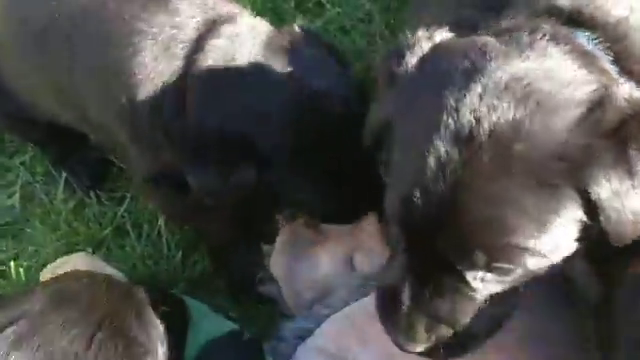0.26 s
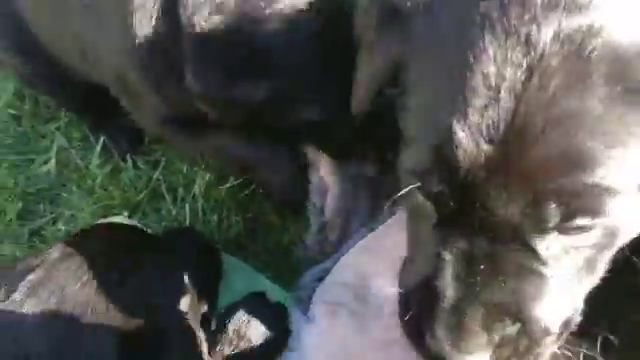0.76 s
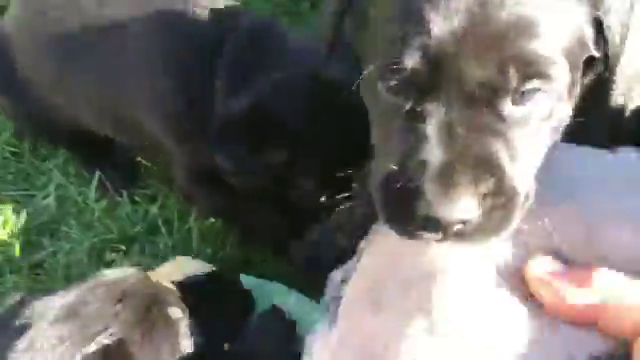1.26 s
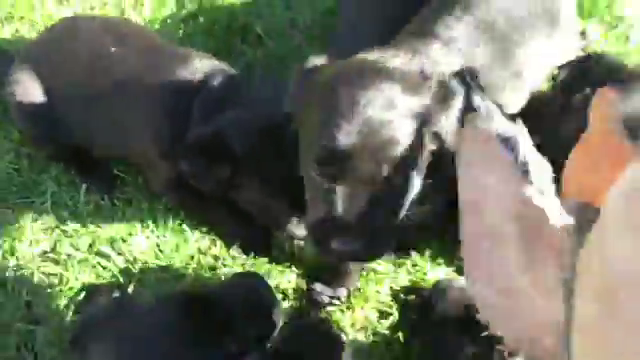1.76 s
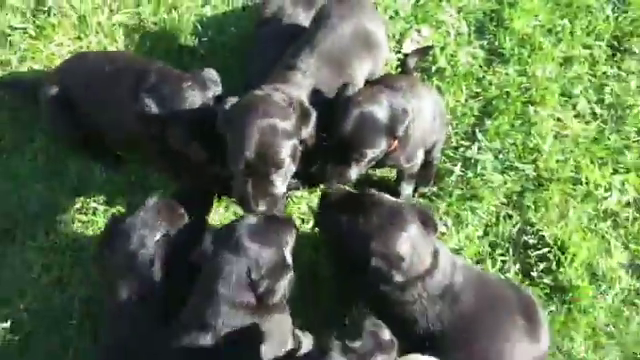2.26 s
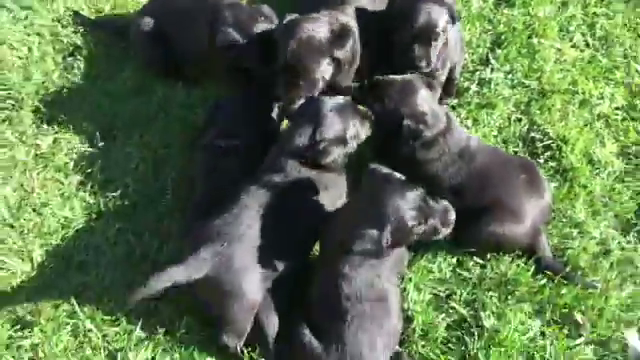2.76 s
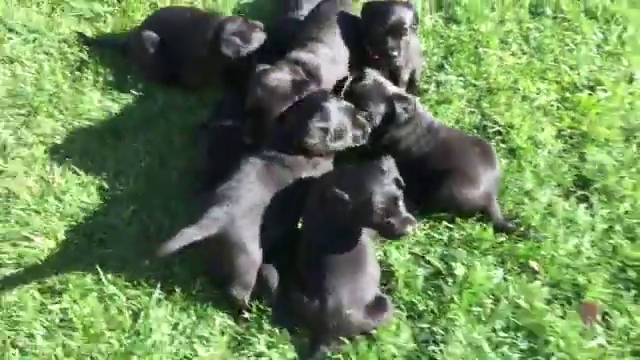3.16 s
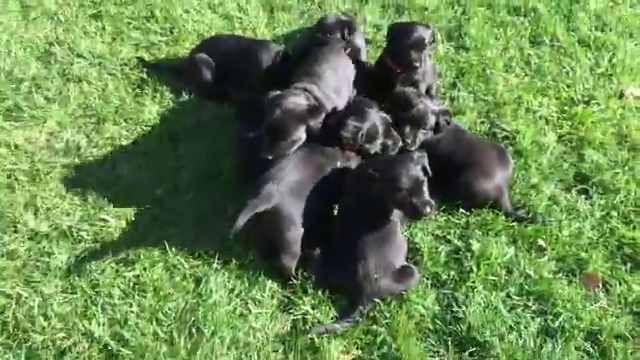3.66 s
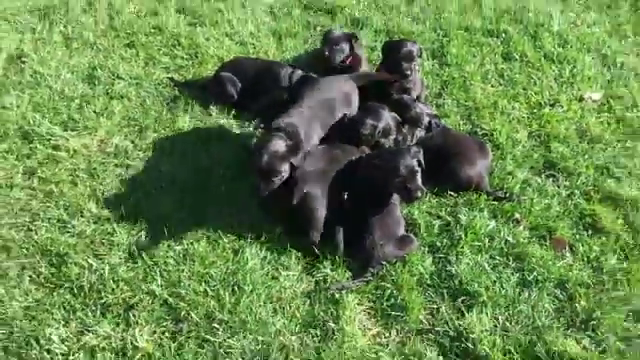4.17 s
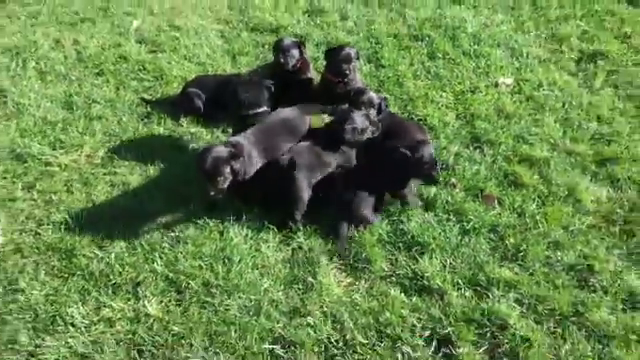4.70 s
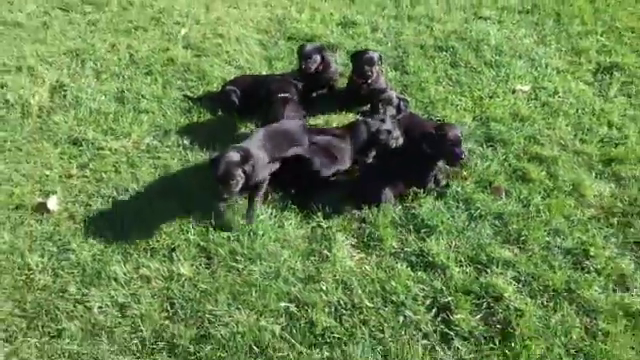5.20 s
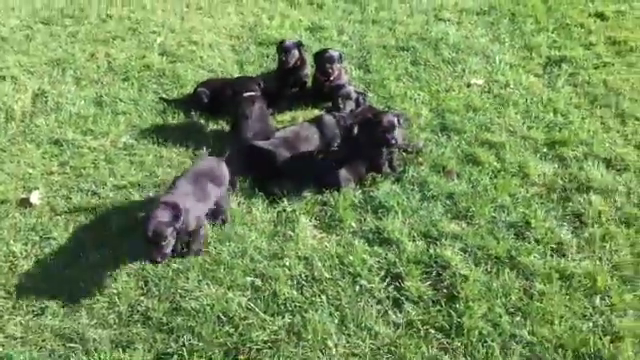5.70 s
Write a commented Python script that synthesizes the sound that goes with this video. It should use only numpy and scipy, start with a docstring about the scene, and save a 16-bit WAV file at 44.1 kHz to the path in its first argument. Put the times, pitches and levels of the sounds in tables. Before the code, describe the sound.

A squeaky plush toy is pumped in quick runs of buzzy, shrill squeaks outdoors, with low bumps knocking the microphone among puppies on grass.

```python
"""A plush squeaky toy is pumped in quick runs among puppies on a lawn, close to one microphone.
Outdoor air, a distant wavering hum and a faint rustle of plush and grass are there from the start.
Near 0.9 s a refill overblows the reed; until about 4 s squeezes buzz, and most are followed by a shriller
refill as the bulb springs back. Each slap of the reed rings the nozzle and lets a puff of air through.
Rounded pressure swings buffet the microphone between 1.8 and 2.8 s, then in a cluster from 4.8 to 5.5 s."""
import sys
import numpy as np
from scipy import signal
from scipy.fft import rfft, irfft
from scipy.io import wavfile

SR = 44100
rng = np.random.default_rng(int(sys.argv[2]) if len(sys.argv) > 2 else 0)


def master_out(mix):
    """Clip the mix to full scale and print it as 16-bit PCM to the path in sys.argv[1]."""
    frames = np.transpose(np.atleast_2d(mix))
    ceiling = np.clip(frames, -1, 1)
    pcm = np.round(ceiling * 32767).astype(np.int16)
    wavfile.write(sys.argv[1], SR, pcm)


N = 262115
TIME = np.arange(N) / SR
BAND_LIMIT_HZ = 15950
EDGE_S = 0.0025  # the reed starts and stops within a cycle or two

# strokes in which the bulb springs back and draws air in; peak is the share of the stroke before the top,
# fullness the exponent of the pitch fall (1 = straight), level_db that of the low partials:
# start_s, length_s, top_pitch_hz, peak, fullness, level_db, whistle_db (re level), rasp_db (re level),
# grip_low_db, grip_mid_db, grip_high_db
REFILLS = [(1.216, 0.11, 518, 0.28, 1.9, -27.5, 7.1, -3.5, -6.5, 3.5, 1.5),
           (1.501, 0.06, 476.8, 0.077, 2.3, -28, 8.5, -5, -1, 1, -5.5),
           (1.921, 0.097, 548.3, 0.38, 1.4, -27.5, 11, -1.5, 3, 1, -4),
           (2.705, 0.093, 510, .43, 1.37, -29, 10.7, -5.5, 6.5, -3, -6),
           (2.958, 0.074, 491, 0.2, 2.1, -29.5, 9.6, -7, 8.5, -2, -5),
           (3.190, .070, 483, 0.16, 2.07, -30.5, 8.6, -6.5, 8.5, -2.5, -9),
           (3.432, 0.09, 491, 0.27, 2.45, -30.8, 6.9, -8, 9, -2, -8)]
# spectrum of air rushing through the nozzle: frequency_hz, level_db (relative)
NOZZLE_AIR = [(300, -28), (3000, -11.5), (4400, -6), (5300, -2.5), (6500, -9), (8500, -16.5), (15000, -20)]


def amp(db):
    """Decibel definition: gain is ten to the power of level over twenty."""
    return 10 ** (np.asarray(db) / 20)


def unit(x):
    """Power normalization: scales a signal to rms 1."""
    return x / np.sqrt(np.mean(x ** 2) + 1e-20)


def spectrum_db(points, hz):
    """Spectral envelope: levels are joined by straight lines over log frequency."""
    f, db = np.transpose(points)
    return np.interp(np.log(hz + 1), np.log(f + 1), db)


def add(mix, start_s, sound):
    """Superposition: sums a sound into the mix from a given time."""
    part = mix[max(round(start_s * SR), 0):][:len(sound)]
    part += sound[:len(part)]


def noise(colour, size):
    """Spectral shaping: white noise is filtered to a given colour at rms 1."""
    spectrum = rfft(rng.standard_normal(size))
    gain = amp(spectrum_db(colour, np.fft.rfftfreq(size, 1 / SR)))
    return unit(irfft(spectrum * gain, size))


def drift(hz, size):
    """Slow random modulation: chance points, two per period of hz, are joined and scaled to rms 1."""
    position = np.arange(size) / SR * 2 * hz
    return unit(np.interp(position, np.arange(4096), rng.standard_normal(4096)))


def toy():
    """Pressure-driven reed: outward and inward flow sound it; flow too slow to start it only hisses."""
    # strokes that squeeze air out, with the columns of REFILLS
    squeezes = [(1.080, 0.12, 541.6, 0.63, 1.3, -28, 1.4, -4.5, -17, 4, 3.5),
                (1.378, 0.083, 529.5, 0.37, 2.6, -27.5, 1.3, -8, -9.5, 1.5, 14.5),
                (1.784, .062, 515.5, 0.17, 2.03, -26, 3.5, -2.5, -4, 3, 2),
                (2.058, .088, 569.6, .40, 0.96, -29.5, 2.2, -2.5, -1, 6, -1),
                (2.536, 0.11, 566.3, .44, 1.24, -26.5, 3.5, -5.5, 1.5, 1, -2),
                (2.839, 0.074, 530, 0.3, 1.76, -30, 4.4, -9, 0.5, -3.5, 0.5),
                (3.074, .060, 516.5, 0.273, 1.3, -30.5, 5.3, -9, 1, -7, 0),
                (3.308, .077, 516, .19, 1.38, -31.5, 4.4, -9.5, 1.5, -4.5, 2),
                (3.571, 0.071, 529.6, 0.31, 1.15, -32, 3.5, -9.5, 2.5, -2, 3.5),
                (3.935, 0.098, 542.3, 0.31, 6.3, -29.5, 1.8, -9, 3.5, 0.5, -1)]
    # colour of reed and nozzle, air going out and coming in: frequency_hz, level_db (relative)
    reed_out = [(450, 1.5), (1000, 3.5), (2100, 1), (3300, -4.5), (4000, -6), (4600, -16.5), (5100, 3.5),
                (5650, 5.5), (6800, -0.5), (7800, -13), (9300, -19.5), (10700, -19.5), (13000, -10),
                (15500, -15)]
    reed_in = [(450, 0), (1000, 6), (1500, 5), (2000, 2), (2800, -6.5), (3600, 2.5), (4500, 8.5),
               (5350, 12), (6200, -2), (7200, -4.5), (8500, -5), (10300, -16.5), (11700, -11), (15500, -16)]
    # reed's response, air going out and coming in: start_pitch_hz, stall_pitch_hz, release_s,
    # mid_fall_whistle_db, then the change by the stall: ebb_level_db, ebb_whistle_db, ebb_rasp_db
    law_out = (488.5, 416, 0.0279, -4.5, -11.5, 1, 3)
    law_in = (478.5, 412, 0.0312, -1.5, -10, 3, -3.5)
    # a first refill that overblows the reed into a higher register:
    # time_s, pitch_hz, level_db, whistle_db (re level), rasp_db (re level)
    overblown = [(.907, 487, -28, -6, -13.5), (.921, 514, -26, -4, -12), (.931, 582, -25.5, -3.5, -12.5),
                 (.936, 701, -25.5, -2.5, -11), (.947, 769, -24, 0.5, -19.5), (.965, 782, -25.5, 2, -14),
                 (.981, 652, -27, 4, -11.5), (.991, 524, -30, 7, -7.5), (1.015, 463, -33.5, 7, -16.5),
                 (1.029, 413, -47, 3, 0)]
    # grip during that refill: low_db, mid_db, high_db
    overblown_grip = (-1.5, -4, 0)
    # air drawn slowly past the silent reed: start_s, length_s, level_db
    hisses = [(2.189, 0.108, -58), (3.65, 0.11, -64)]

    out = np.zeros(N)
    for *row, low_db, mid_db, high_db in squeezes:
        path = stroke(law_out, *row)
        add(out, *squeak(path, reed_out, (low_db, mid_db, high_db), lag_cycles=0.47))
    for *row, low_db, mid_db, high_db in REFILLS:
        path = stroke(law_in, *row)
        add(out, *squeak(path, reed_in, (low_db, mid_db, high_db), lag_cycles=0.4))
    add(out, *squeak(overblown, reed_in, overblown_grip, lag_cycles=0.35))
    for start_s, length_s, level_db in hisses:
        size = int(length_s * SR)
        add(out, start_s, amp(level_db) * np.hanning(size) * noise(NOZZLE_AIR, size))
    return out


def stroke(law, start_s, length_s, top_hz, peak, fullness, level_db, whistle_db, rasp_db, count=60):
    """Pressure control of a reed: pressure rises to a top and ebbs to a stall; pitch and levels follow."""
    start_hz, stall_hz, release_s, dip_db, ebb_db, ebb_whistle_db, ebb_rasp_db = law
    attack_db = -3  # level at the start, re the top
    ebb_power = 1.56  # level holds longer than pitch
    whistle_sag_db = -1  # the whistle's steady drift over the whole stroke
    bite_db, bite_s = 2.5, 0.008  # extra treble of the first slaps and its decay time

    t = np.linspace(EDGE_S, length_s - EDGE_S, count)
    progress = t / length_s
    peak = np.clip(peak, 0.02, 0.9)
    rise = np.maximum(1 - progress / peak, 0) ** 2  # 1 at the start, 0 at the top
    ebb = np.maximum((progress - peak) / (1 - peak), 0) ** fullness  # 0 at the top, 1 at the stall

    pitch = top_hz + (start_hz - top_hz) * rise + (stall_hz - top_hz) * ebb
    release_db = 20 * np.log10(np.minimum((length_s - t) / release_s, 1))
    level = level_db + attack_db * rise + ebb_db * ebb ** ebb_power + release_db
    bite = bite_db * np.exp(-t / bite_s)
    whistle = whistle_db + dip_db * np.sin(np.pi * ebb) ** 2 + ebb_whistle_db * ebb
    whistle += whistle_sag_db * (progress - 0.5) + bite
    rasp = rasp_db + ebb_rasp_db * ebb + bite
    return np.transpose([start_s + t, pitch, level, whistle, rasp])


def squeak(path, colour, grip, lag_cycles, whistle_hz=3000, rasp_hz=8000):
    """Beating reed: it slaps shut once a cycle; each slap rings the nozzle and lets a puff through."""
    # unsteadiness, greatest between the reed's two registers: pitch_hz, rms_share_of_pitch
    jitter_points = [(420, .005), (455, .001), (570, .001), (600, .012), (740, .012), (772, .003)]
    # the rasp turns to hiss as the reed slows: pitch_hz, hiss_share (of rasp power)
    hiss_points = [(430, .85), (490, .3), (530, .12)]
    # colour of that hiss: frequency_hz, level_db (relative)
    rasp_air = [(3000, -30), (7000, -3), (10300, -5), (13500, 0), (16000, -2)]
    rattle = 10  # an unsteady reed slaps unevenly: change of strength per change of pitch
    puff_db = -16  # air noise re the whistle

    s, *columns = np.transpose(path)
    t = np.arange(s[0] - EDGE_S, s[-1] + EDGE_S, 1 / SR)
    pitch, level_db, whistle_db, rasp_db = (np.interp(t, s, c) for c in columns)
    jitter = np.interp(pitch, *np.transpose(jitter_points))
    turns = np.cumsum(pitch * (1 + jitter * drift(200, len(t)))) / SR
    cycle = turns % 1

    harmonic = np.arange(1, 38)[:, None]
    hz = harmonic * pitch
    gain = amp(spectrum_db(colour, hz) + muffle(grip, hz))
    partial = gain * bounce(hz) * (hz < BAND_LIMIT_HZ + 500)
    # the soft bulb answers late: low partials trail the slap
    lagged_turns = harmonic * turns - lag_cycles * np.log(hz / 5000)
    phase = 2 * np.pi * lagged_turns + ring_phase(colour, hz)
    waves = (partial * np.exp(1j * phase)).real

    def band(weight):
        """Band levelling: weighted partials are summed and held at rms 1."""
        power = (abs(weight * partial) ** 2).sum(0) / 2
        return (weight * waves).sum(0) / np.sqrt(power + 1e-12)

    # low partials, the nozzle's whistle and the rasp of the slap grow at their own rates
    above_low = 1 / (1 + (whistle_hz / hz) ** 12)
    above_mid = 1 / (1 + (rasp_hz / hz) ** 12)
    low, whistle, rasp = band(1 - above_low), band(above_low - above_mid), band(above_mid)

    hiss_share = np.interp(pitch, *np.transpose(hiss_points))
    hiss = unit(noise(rasp_air, len(t)) * (2 - cycle))  # strongest just after each slap
    rasp = np.sqrt(1 - hiss_share) * rasp + np.sqrt(hiss_share) * hiss
    treble = amp(whistle_db) * whistle + amp(rasp_db) * rasp
    treble *= 1 + 0.05 * drift(200, len(t))
    puff_shape = unit(0.91 + np.exp(-cycle / 0.61))
    puffs = noise(NOZZLE_AIR, len(t)) * puff_shape * amp(puff_db + whistle_db)

    fade = np.clip(np.minimum(t - t[0], t[-1] - t) / EDGE_S, 0, 1)
    slap_strength = 1 + rattle * jitter * drift(600, len(t))
    return t[0], amp(level_db) * fade * slap_strength * (low + treble + puffs)


def ring_phase(colour, hz, size=4096):
    """Minimum phase: a causal resonator's lag is the Hilbert transform of its log gain."""
    grid = np.fft.fftfreq(size, 1 / SR)
    log_gain = np.log(amp(spectrum_db(colour, abs(grid))))
    phase = -signal.hilbert(log_gain).imag
    return np.interp(hz, grid[:size // 2], phase[:size // 2])


def muffle(grip, hz, width_hz=250, widening=0.035):
    """Resonance and absorption: hand and plush around the nozzle lift or muffle three bands, in dB."""
    # centres of the low, middle and high bands: frequency_hz
    centres = (2520, 3700, 8400)
    return sum(db * np.exp(-0.5 * ((hz - f) / (width_hz + widening * f)) ** 2)
               for f, db in zip(centres, grip))


def bounce(hz, count=6):
    """Comb interference: tiny echoes in the deforming bulb put a sliding ripple, mostly on high partials."""
    delay_s = rng.uniform(0.0003, 0.0015, count)
    strength = unit(rng.standard_normal(count)) / np.sqrt(count)
    grid = np.linspace(0, SR / 2, num=512)
    ripple = strength @ np.exp(-2j * np.pi * delay_s[:, None] * grid)
    stretch = np.linspace(0.9, 1.1, hz.shape[1])
    share = np.interp(hz, [4500, 10000], [0.08, 0.42])
    return 1 + share * np.interp(hz * stretch, grid, ripple)


def yard(x, t60_s=0.79, wet_db=-40, size=22050):
    """Diffuse reflection: sparse, decaying random echoes come faintly from the garden."""
    t = np.arange(size) / SR
    present = (rng.random(size) < 0.06) * (t > 0.004)
    taps = rng.standard_normal(size) * present * amp(-60 * t / t60_s)
    return amp(wet_db) * signal.fftconvolve(x, taps / np.linalg.norm(taps))[:N]


def buffets(roundness=2.6, churn_db=-11.0, churn_s=0.0054, churn_reach=1.15):
    """Transient pressure: each eddy or knock is a rounded, damped swing with a short dull churn."""
    # single buffets on the microphone: start_s, envelope_peak_db, centre_hz
    blows = [(1.813, -29, 133), (1.876, -31, 263), (2.203, -34.5, 88.5), (2.382, -24, 109.6),
             (2.434, -27.5, 262), (2.606, -13.5, 178), (2.712, -26, 145), (2.758, -27.5, 129.3),
             (4.842, -27, 312), (4.85, -22, 85.7), (4.882, -38, 348), (4.913, -29.5, 182),
             (4.968, -32.5, 392), (4.980, -28, 366), (4.984, -21.5, 123.8), (5.014, -24, 258),
             (5.079, -26.5, 402), (5.107, -17.5, 640), (5.115, -22.5, 385), (5.133, -23.5, 423),
             (5.144, -14.5, 270), (5.146, -28, 600), (5.158, -20, 170), (5.174, -27.5, 490),
             (5.199, -37, 330), (5.327, -33, 315), (5.412, -26.5, 347)]
    swing_cycles = 0.55  # the envelope peaks after this many cycles
    out, t = np.zeros(N), np.arange(SR // 10) / SR
    for start_s, db, hz in blows:
        u, v = t * hz / swing_cycles, t / churn_s
        swing = (u * np.exp(1 - u)) ** roundness * np.sin(2 * np.pi * hz * t)
        edge_hz = churn_reach * hz
        churn = noise([(30, -12), (130, 0), (edge_hz, -4), (2 * edge_hz, -30), (8000, -80)], len(t))
        add(out, start_s, amp(db) * (swing + amp(churn_db) * v * np.exp(1 - v) * churn))
    return out


def gusts():
    """Turbulence: low, lumpy noise swells in spells around the buffets."""
    # spells of turbulence: start_s, length_s, level_db
    spells = [(1.77, .18, -39), (2.26, .25, -38), (2.5, .16, -37), (2.71, .09, -39), (4.81, .76, -42),
              (5.08, .13, -33)]
    # its spectrum: frequency_hz, level_db (relative)
    colour = [(20, -15.5), (50, 9), (130, 1.5), (250, -11.5), (700, -39), (3000, -86)]
    edge_s, lump_db = 0.046, 3  # rise and fall of a spell; rms lumpiness
    turbulence = unit(noise(colour, N) * amp(lump_db * drift(30, N)))
    out = np.zeros(N)
    for start_s, length_s, db in spells:
        inside_s = np.minimum(TIME - start_s, start_s + length_s - TIME)
        out += turbulence * amp(db) * np.clip(inside_s / edge_s, 0, 1)
    return out


def rustle():
    """Friction noise: plush and grass rub in grainy swells over the litter's constant stirring."""
    # swells and fades of rubbing: start_s, length_s, level_db
    rubs = [(.22, 0.37, -64), (.9, 2.26, -67), (2.332, .12, -53.5), (2.595, 1.27, -58), (3.087, .13, -54),
            (3.22, 0.094, -58), (4.212, 0.25, -55.5), (4.498, 0.26, -69)]
    # spectrum of the rubbing: frequency_hz, level_db (relative)
    colour = [(400, -44.5), (700, -7), (2000, -6.5), (4800, -11.5), (6000, -7), (10000, -8.5),
              (16000, -6.5)]
    stir_db, grain_db = -74, 2.2  # constant stirring; rms graininess
    strength = np.full(N, amp(stir_db))
    for start_s, length_s, db in rubs:
        add(strength, start_s, amp(db) * np.hanning(int(length_s * SR)))
    return strength * unit(noise(colour, N) * amp(grain_db * drift(110, N)))


def snaps(t60_s=0.028, size=2048):
    """Impulsive excitation: grass, claws and the bulb flicking back give short decaying noise bursts."""
    # small snaps of grass and claws: start_s, level_db, centre_hz, width_octaves
    ticks = [(0.13, -52.5, 8000, 4), (0.205, -55.5, 443, .5), (.705, -60.5, 6000, 0.1),
             (1.043, -55, 3500, 1.2), (2.402, -48, 2070, 0.3), (4.352, -42, 8060, 3),
             (4.379, -49, 6050, 0.1), (4.404, -48, 7000, 2.8), (4.998, -53.5, 6095, 0.098),
             (5.65, -53.5, 6100, 0.11)]
    # the bulb flicks back into shape after a refill: level_db, centre_hz, width_octaves (sign is idle)
    flick = (-42.5, 3498, -2.7)
    flick_delay_s = 0.003
    flicks = [(start_s + length_s + flick_delay_s, *flick) for start_s, length_s, *_ in REFILLS]
    out = np.zeros(N)
    t, f = np.arange(size) / SR, np.fft.rfftfreq(size, 1 / SR) + 1
    for start_s, db, hz, octaves in list(ticks) + flicks:
        bell = np.exp(-0.5 * (np.log2(f / hz) / octaves) ** 2)
        snap = irfft(rfft(rng.standard_normal(size)) * bell)
        add(out, start_s, amp(db - 60 * t / t60_s) * unit(snap))
    return out


def distant_hum():
    """Periodic source: a distant machine is one sine that wavers in pitch and level."""
    # its level before the wavering: time_s, level_db
    levels = [(.9, -50.5), (1.6, -57.5), (5.94, -55)]
    hz = 120.7 + 1.2 * drift(5, N)
    db = np.interp(TIME, *np.transpose(levels)) + 2 * drift(1.8, N)
    return amp(db) * np.sqrt(2) * np.sin(2 * np.pi * np.cumsum(hz) / SR)


def open_air(level_db=-52.5):
    """Stationary ambient noise: outdoor rumble and hiss keep one spectrum throughout."""
    # outdoor spectrum: frequency_hz, level_db (relative)
    colour = [(12, -46), (20, -9.5), (88, -8), (120, -11), (134, -10.5), (154, -16.5), (234, -23.5),
              (434, -34), (527, -38.5), (678, -38.5), (976, -37.5), (1120, -39), (1810, -40.5), (2820, -44),
              (16000, -49)]
    return amp(level_db) * noise(colour, N)


def scene():
    """Superposition: all sources and the toy's echoes add at one microphone, on two equal channels."""
    squeaks = toy()
    near = squeaks + yard(squeaks) + buffets() + gusts() + rustle() + snaps()
    mono = near + distant_hum() + open_air()
    return np.array([mono, mono])


def record(dry):
    """Linear filtering: a bass roll-off below 36 Hz and a steep upper band limit."""
    bass_cut = signal.butter(2, 36, "high", fs=SR, output="sos")
    thinned = signal.sosfilt(bass_cut, dry)
    band_limit = signal.firwin(511, BAND_LIMIT_HZ, window=("kaiser", 9), fs=SR)
    return signal.oaconvolve(thinned, band_limit[None], "same")


dry = scene()
out = record(dry)
master_out(out)
```